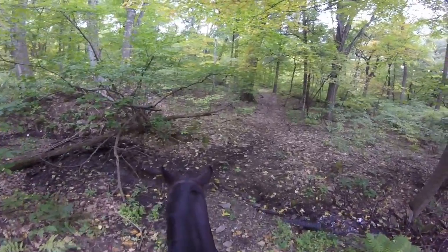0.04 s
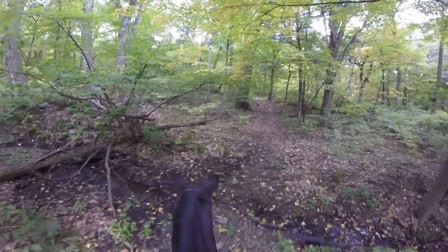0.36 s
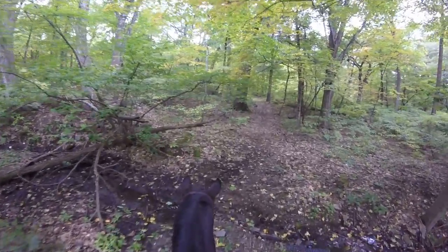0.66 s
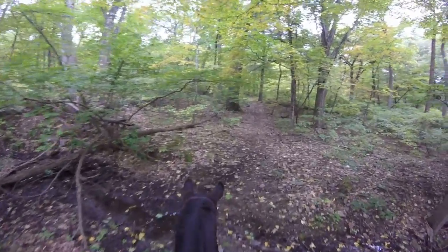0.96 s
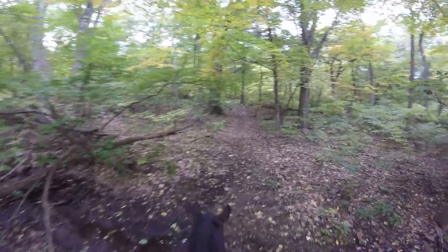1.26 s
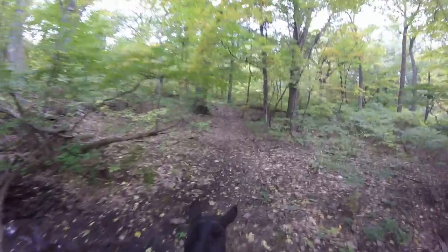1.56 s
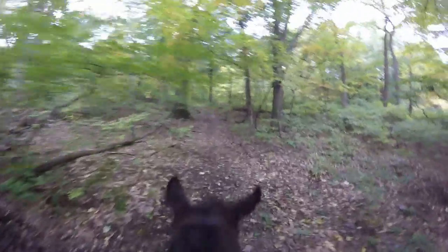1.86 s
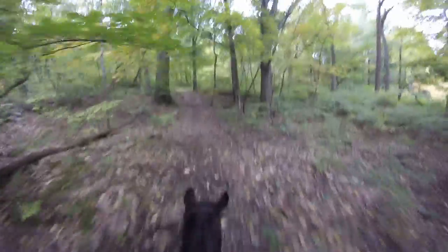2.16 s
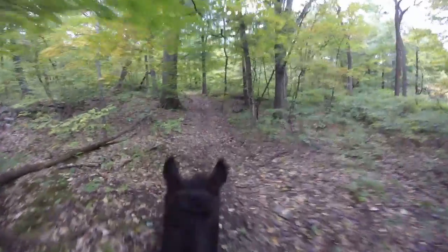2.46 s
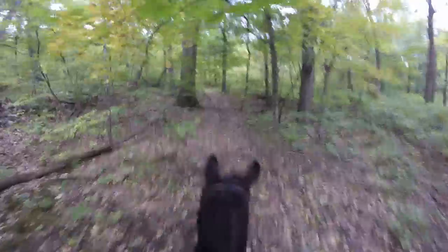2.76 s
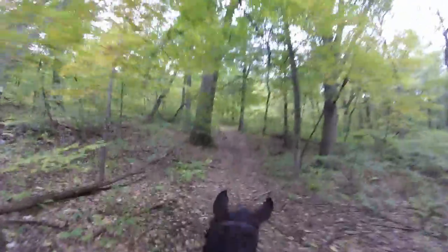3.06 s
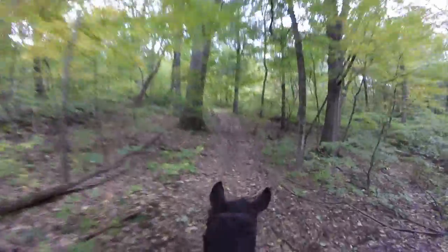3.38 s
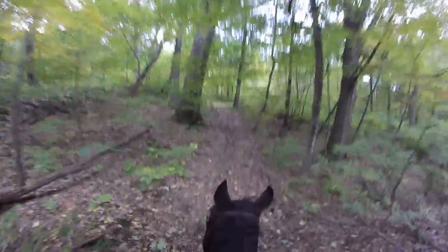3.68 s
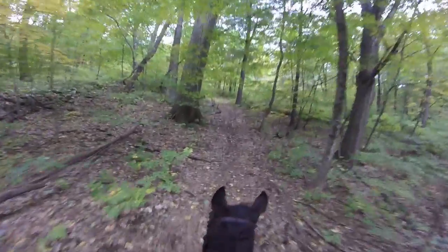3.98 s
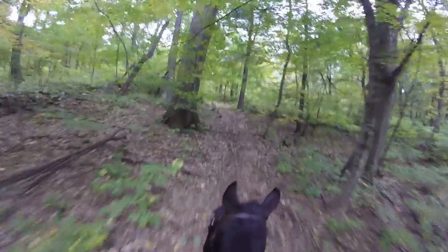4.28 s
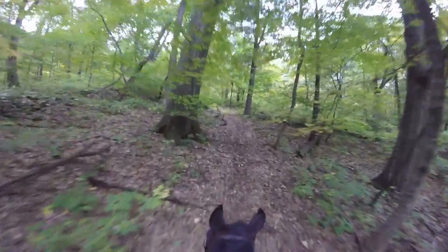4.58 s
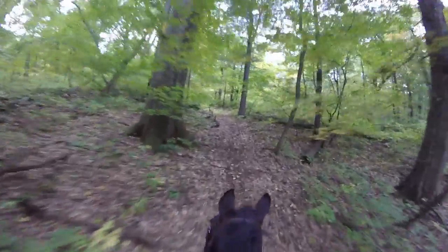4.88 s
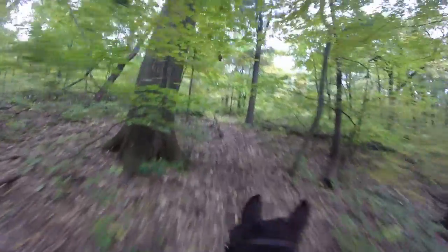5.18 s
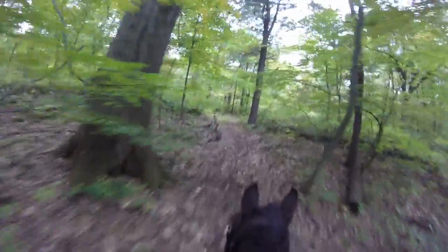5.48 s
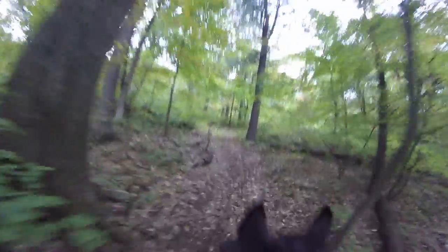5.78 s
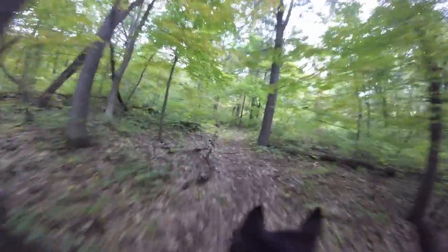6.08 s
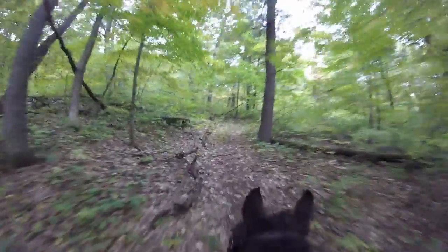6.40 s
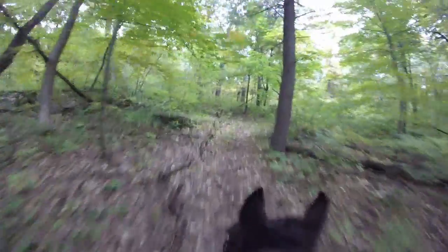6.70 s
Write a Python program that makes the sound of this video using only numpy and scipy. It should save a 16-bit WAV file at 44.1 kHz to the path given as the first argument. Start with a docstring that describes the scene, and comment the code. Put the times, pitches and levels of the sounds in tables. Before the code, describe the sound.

A ridden horse clacks over stone, strikes a rock, and speeds along a leafy trail with dull thuds and rustling.

```python
"""Horseshoes clack on a stony stream bed over a low rumble of the rider's movement and rushing air.
Each impact excites damped resonances of hoof and shoe; one sharp crack on a rock leaves the iron ringing.
The horse speeds up along a forest trail, where hooves thud in soft earth and brush through leaves
in showers of tiny snaps. A brief low hum comes at the end. The case of the rider's camera dulls it all."""
import sys
import numpy as np
from scipy import signal
from scipy.fft import rfft, irfft
from scipy.io import wavfile

SR = 44100
rng = np.random.default_rng(int(sys.argv[2]) if len(sys.argv) > 2 else 0)


def master_out(mix):
    """Clip the mix to full scale and print it as 16-bit PCM to the path in sys.argv[1]."""
    frames = np.transpose(np.atleast_2d(mix))
    ceiling = np.clip(frames, -1, 1)
    pcm = np.round(ceiling * 32767).astype(np.int16)
    wavfile.write(sys.argv[1], SR, pcm)


N = 306262
TIME = np.arange(N) / SR
AGE = np.arange(SR // 2) / SR   # seconds since a contact
SWAY_HZ = 48.25   # the lowest resonance, in which every jolt ends


def from_db(db):
    """Amplitude grows tenfold for every 20 dB."""
    return 10 ** (np.asarray(db) / 20)


def rms_one(x):
    """Normalisation to unit mean power."""
    return x / np.sqrt(np.mean(x ** 2) + 1e-20)


def add(track, start_s, sound):
    """Superposition: a sound sums into the track from its start time."""
    start = max(round(start_s * SR), 0)
    track[start:start + len(sound)] += sound[:max(N - start, 0)]


def resonate(force, hz, width_hz):
    """Two resonators in cascade give one peak with steep skirts."""
    r = np.exp(-np.pi * 1.5 * width_hz / SR)   # pole radius; each stage is wider than the pair
    gain = (1 - r * r) / 2
    section = [gain, 0, -gain, 1, -2 * r * np.cos(2 * np.pi * hz / SR), r * r]
    return signal.sosfilt([section, section], force + 1e-18)


def colour(force, peaks):
    """Parallel filters share the energy of a force among spectral peaks; rms 1."""
    return rms_one(sum(from_db(db) * rms_one(resonate(force, hz, width)) for hz, width, db in peaks))


def noise(spectrum):
    """Spectral shaping colours white noise, falling 12 dB more per octave beyond the ends; rms 1."""
    hz, db = np.transpose(spectrum)
    bin_hz = np.maximum(np.arange(N // 2 + 1) * SR / N, 1)
    rolloff = (np.minimum(bin_hz / hz[0], 1) * np.minimum(hz[-1] / bin_hz, 1)) ** 2
    shape = from_db(np.interp(np.log(bin_hz), np.log(hz), db))
    return rms_one(irfft(rfft(rng.standard_normal(N)) * rolloff * shape, N))


def grains(spread_db, size):
    """A log-normal spread of strengths turns noise into dense, uneven snaps."""
    return rng.standard_normal(size) * from_db(spread_db * np.clip(rng.standard_normal(size), -2, 2))


def after_footfalls(delay_s, half_length_s):
    """A Gaussian envelope swells to 1 just after each hoof lands on earth or stone."""
    peaks_s = np.array([row[0] for row in EARTH_STEPS + STONE_STEPS]) + delay_s
    distance_s = np.abs(TIME[:, None] - peaks_s).min(axis=1)
    return np.exp(-(distance_s / half_length_s) ** 2)


# The rider's rocking, greatest in the lunge out of the stream bed.
# Each row: time in seconds, rumble level in dB before footfalls and gusts.
RIDER_ROCKING = [(0.0, -63), (0.29, -57), (0.66, -60), (1.08, -57), (1.78, -50), (2.26, -38.5),
                 (2.7, -50.5), (3.19, -48), (3.38, -50.5), (3.88, -50), (4.0, -53), (4.72, -54),
                 (4.83, -54), (5.28, -55), (5.49, -47.5), (6.94, -54)]
# Spectra of the rumble and of the air. Each row: frequency in Hz, relative density in dB.
RUMBLE_SPECTRUM = [(12, 9.5), (22, 6), (35, -1.5), (50, 0), (80, -18.5), (140, -33), (300, -61)]
AIR_SPECTRUM = [(40, 2), (70, 2.5), (130, 4), (230, 1.5), (330, -4.5), (500, -9.5), (700, -16),
                (1200, -18.5)]


def movement(pace_db, shake_db=6, air_offset_db=1.03, gust_db=2.0):
    """Forced vibration: the camera sways with the rider, while gusts modulate the rumble and airflow."""
    rocking_db = np.interp(TIME, *np.transpose(RIDER_ROCKING))
    rumble_db = rocking_db + shake_db * after_footfalls(delay_s=0.041, half_length_s=0.06)
    gusts = from_db(gust_db * noise([(3, -2), (14, -2)]))   # fluctuations of 3 to 14 Hz
    rumble = from_db(rumble_db) * noise(RUMBLE_SPECTRUM)
    sway = from_db(-57.5) * rms_one(resonate(rng.standard_normal(N), SWAY_HZ, width_hz=10.7))
    air = from_db(pace_db + air_offset_db) * noise(AIR_SPECTRUM)
    return sway + gusts * (rumble + air)


# The background spectrum. Each row: frequency in Hz, relative density in dB.
HISS_SPECTRUM = [(200, -8), (400, -5), (750, -6.5), (1100, -8.5), (1550, -11), (2600, -13), (3600, -16),
                 (5000, -18.5), (7500, -22.5), (15000, -27.5)]


def hiss(level_db=-62):
    """Stationary broadband noise is heard as a faint, even hiss."""
    return from_db(level_db) * noise(HISS_SPECTRUM)


# Leaves as heard through the case. Each row: frequency in Hz, bandwidth in Hz, relative level in dB.
LEAF_COLOUR = [(1544, 220, 4.5), (2160, 360, 1), (2460, 410, -0.5), (2979, 530, -6), (3970, 140, -7)]


def rustle(pace_db, base_db=-70.5, middle_pace_db=-60, db_per_pace_db=0.68, stir_db=2.5):
    """Random excitation: tiny snaps drive the leaves, harder with pace and after each footfall."""
    level_db = base_db + db_per_pace_db * (pace_db - middle_pace_db)
    level_db += stir_db * after_footfalls(delay_s=0.043, half_length_s=0.075)
    return from_db(level_db) * colour(grains(spread_db=11.5, size=N), LEAF_COLOUR)


def scrape(length_s, peaks, top_hz, treble_peaks, treble_db, tail_db, tail_t60):
    """Friction makes noise as a shoe grinds on stone, then grit settles; unit power while it sounds."""
    pressure = np.sin(np.pi * np.minimum(AGE / length_s, 1)) ** .5
    settling = from_db(tail_db - 60 * AGE / tail_t60)
    force = (pressure + settling) * rng.standard_normal(len(AGE))
    # inertia keeps the shoe from following the fastest part of the force
    shoe = signal.sosfilt(signal.butter(8, top_hz, fs=SR, output="sos"), colour(force, peaks))
    sound = shoe + from_db(treble_db) * colour(force, treble_peaks)
    sounding_s = length_s + .002   # the sound lasts a little past the contact
    return sound * np.sqrt(sounding_s * SR / np.sum(sound ** 2))


def slap(top_hz, low_hz=190):
    """Yielding soil limits the bandwidth of an impulse; peak 1."""
    impulse = (AGE == 0) + 1e-18
    push = signal.sosfilt(signal.butter(2, low_hz, "high", fs=SR, output="sos"), impulse)
    push = signal.sosfilt(signal.cheby1(5, 2, top_hz, fs=SR, output="sos"), push)
    return push / np.abs(push).max()


def thud(start_hz, t60, glide_s=0.0056, rise_s=0.0032):
    """Damped oscillation: the pitch of a blow on soft ground settles to the lowest resonance."""
    hz = SWAY_HZ + (start_hz - SWAY_HZ) * np.exp(-AGE / glide_s)
    envelope = (1 - np.exp(-(AGE / rise_s) ** 2)) * from_db(-60 * AGE / t60)
    return -envelope / envelope.max() * np.sin(2 * np.pi * np.cumsum(hz) / SR)


# Shoes on stone. Each row: time in seconds, clack level before filtering in dB, contact in seconds,
# ring pitch in Hz, bandwidth in Hz, relative treble in dB, jolt in dB, slap in dB, slap cutoff in Hz.
STONE_STEPS = [(0.104, -44, 0.0031, 1460, 220, -11, -42.5, -60, 400),
               (0.3280, -39, 0.0042, 1600, 274, -14.5, -39.5, -44.5, 436),
               (0.614, -54.5, 0.0036, 2230, 500, -14, -53, -44.5, 345),
               (0.874, -37.5, 0.0088, 1590, 366, -15.5, -38, -47, 473),
               (0.8833, -38, 0.0024, 1960, 320, -16, -54, -56, 476),
               (1.1532, -33, 0.0098, 1564, 332, -18, -39.5, -50, 520),
               (1.762, -46, 0.0037, 1600, 400, -24, -66, -42, 900),
               (3.0851, -49, 0.0032, 1910, 1200, -18, -57, -60, 500),
               (4.471, -56.5, 0.0058, 1470, 500, -20, -62, -56.5, 500),
               (4.988, -55, 0.002, 1400, 500, -25, -65, -45, 820),
               (5.536, -40.5, 0.0042, 1780, 413, -38, -53, -43, 860),
               (5.7986, -36.5, 0.0026, 1900, 600, -29, -51, -39.5, 820),
               (6.556, -55, 0.0037, 1750, 500, -15, -58, -58, 520)]
# Modes of hoof and shoe. Each row: multiple of the ring pitch, relative level in dB.
HOOF_MODES = [(1, 6.5), (.88, -10), (1.28, -1.5), (1.48, -10.5), (1.84, -10)]
# Gritty treble of the clacks, coloured by the camera case's resonances.
# Each row: frequency in Hz, bandwidth in Hz, relative level in dB.
CLACK_TREBLE = [(4280, 466, 10), (4620, 230, -8), (6280, 220, 9), (6940, 350, 6), (7560, 350, 1)]
# Bands that the camera case dulls in the clacks. Each row: frequency in Hz, bandwidth in Hz.
CASE_NOTCHES = [(1080, 150), (3620, 1270), (5500, 850)]


def hooves_on_stone():
    """Impact rings the hoof and slaps the stone into the soil; a jolt follows as the leg is loaded."""
    clacks, ground = np.zeros((2, N))
    for s, db, length_s, pitch_hz, width_hz, treble_db, jolt_db, slap_db, slap_hz in STONE_STEPS:
        modes = [(ratio * pitch_hz, width_hz, mode_db) for ratio, mode_db in HOOF_MODES]
        clack = scrape(length_s, modes, top_hz=3170, treble_peaks=CLACK_TREBLE, treble_db=treble_db,
                       tail_db=-11, tail_t60=0.072)
        add(clacks, s - .001, from_db(db) * clack)
        add(ground, s + 0.0013, -from_db(slap_db) * slap(slap_hz))
        add(ground, s + 0.0071, from_db(jolt_db) * thud(SWAY_HZ, t60=0.19, rise_s=0.011))
    for hz, width_hz in CASE_NOTCHES:
        clacks = signal.lfilter(*signal.iirnotch(hz, hz / width_hz, fs=SR), clacks + 1e-18)
    # below its modes the hoof radiates little
    return ground + signal.sosfilt(signal.butter(6, 1230, "high", fs=SR, output="sos"), clacks)


# Hooves on earth. Each row: start in seconds, thud level in dB, starting pitch in Hz,
# time to decay by 60 dB in seconds.
EARTH_STEPS = [(1.496, -48, 240, 0.035), (1.906, -42, 32, 0.13), (2.065, -37, 30, 0.16),
               (2.234, -24.5, 36, 0.19), (2.311, -25.5, 44.6, 0.34), (2.573, -36.5, 169, .06),
               (2.620, -27.5, 289, 0.188), (2.831, -35, 170, 0.097), (2.967, -31, 71, 0.043),
               (3.04, -32, 84.5, 0.34), (3.189, -32.5, 166, 0.073), (3.641, -32, 150, 0.17),
               (3.688, -28.5, 175, 0.16), (3.828, -31.5, 150, 0.072), (4.334, -31, 233, 0.16),
               (4.734, -44, 79.5, 0.063), (4.987, -22, 264, 0.098), (5.338, -27.5, 184, 0.132),
               (5.503, -32.5, 48, 0.11), (5.54, -27, 54.7, 0.2), (5.794, -26.5, 250, 0.2),
               (6.067, -21.5, 228.5, 0.12), (6.219, -33, 155, 0.11), (6.554, -28, 185, 0.089),
               (6.613, -24.5, 151, 0.2), (6.818, -32.5, 150, 0.1)]


def hooves_on_earth(slap_db=-13.5, slap_at_hz=235, slap_db_per_octave=15.5):
    """Soft earth damps each blow to a thud; the higher its pitch, the harder the hoof slaps the soil."""
    out = np.zeros(N)
    soil = slap(top_hz=476)
    for s, db, start_hz, t60 in EARTH_STEPS:
        slap_gain = from_db(slap_db + slap_db_per_octave * np.log2(start_hz / slap_at_hz))
        add(out, s, from_db(db) * (thud(start_hz, t60) - slap_gain * soil))
    return out


# Hooves brushing leaves. Each row: start in seconds, level in dB, time scale in seconds,
# scratch pitch in Hz, relative level of the crisp treble in dB.
LEAF_SWEEPS = [(1.757, -51, 0.043, 1950, -16), (1.779, -54.5, 0.059, 2310, -14),
               (1.862, -57, 0.07, 1600, -16), (2.107, -47, 0.0096, 1500, -15),
               (2.116, -52.5, 0.069, 2600, -10.5), (2.373, -59.5, 0.049, 1600, -9),
               (2.401, -57, 0.032, 2940, -3.5), (2.483, -58, 0.054, 1500, -21.5),
               (2.513, -58, 0.025, 1500, -4.5), (2.826, -52, 0.038, 2840, -8.5),
               (3.108, -59.5, 0.055, 2400, -11), (3.388, -66, 0.073, 1600, -8),
               (3.848, -61.5, 0.032, 3200, -10), (5.830, -61, 0.15, 1640, -19),
               (6.012, -61, 0.0474, 2400, -5), (6.364, -59.5, .07, 3800, -9), (6.441, -60, 0.031, 1500, -4)]
# Crisp leaves heard through the case. Each row: frequency in Hz, bandwidth in Hz, relative level in dB.
LEAF_TREBLE = [(4500, 840, 5), (6180, 270, 8), (7650, 1800, 8.5), (9500, 2000, -19.5)]


def leaf_swishes(scratch_width_hz=510, scratch_db=1):
    """Impulsive excitation: leaves crackle under a hoof, and each sweep adds a resonance of its own."""
    out = np.zeros(N)
    for s, db, length_s, scratch_hz, crisp_db in LEAF_SWEEPS:
        snaps = grains(spread_db=8.5, size=len(AGE))
        envelope = (1 - np.exp(-6 * AGE / length_s)) * np.exp(-1.7 * AGE / length_s)
        peaks = [*LEAF_COLOUR, (scratch_hz, scratch_width_hz, scratch_db)]
        crackle = colour(snaps, peaks) + from_db(crisp_db) * colour(snaps, LEAF_TREBLE)
        add(out, s, from_db(db) * envelope / envelope.max() * crackle)
    return out


# A shoe skids, cracks against a rock and slips off.
# Each row: time in seconds, level in dB, contact in seconds, relative level of the chipping in dB.
ROCK_CONTACTS = [(2.1967, -35, .007, -10.5), (2.2037, -30, 0.0082, -23), (2.211, -19.5, 0.0016, -26.5),
                 (2.216, -30, 0.0029, -22), (2.2228, -43.5, 0.012, -11)]
# Spectral peaks of the sharp crack, made by rapid successive contacts, and the treble of stone chipping.
# Each row: frequency in Hz, bandwidth in Hz, relative level in dB.
CRACK_COLOUR = [(520, 83, -19.5), (1065, 81, -20), (1200, 91, -23), (1400, 150, -9.5), (1600, 120, -2),
                (1837, 140, -7), (2090, 150, -7.5), (2192, 240, 1), (2430, 140, -10.5), (2600, 35, -13),
                (2794, 98, -6.5), (3200, 130, -13.5), (3720, 100, -21.5), (3880, 72, -20.5)]
CHIP_TREBLE = [(3910, 230, 4), (5640, 650, -2), (6300, 450, -3), (7420, 610, -0.5), (9700, 1200, -10)]
# The iron shoe. Each row: frequency in Hz, relative level in dB, time to decay by 60 dB in seconds.
SHOE_MODES = [(1140, -17, 0.17), (1500, -19, .3), (1830, -2, 0.27), (1980, -18, .19), (2790, 0, 0.062),
              (3970, -23, .26)]


def crack(strike_s=2.211, ring_db=-37, knock_db=-31.5):
    """A hard strike knocks a rock into the soil and leaves the shoe ringing in free vibration."""
    out = np.zeros(N)
    for s, db, length_s, chip_db in ROCK_CONTACTS:
        strike = scrape(length_s, CRACK_COLOUR, top_hz=3960, treble_peaks=CHIP_TREBLE, treble_db=chip_db,
                        tail_db=-17, tail_t60=0.075)
        add(out, s - .002, from_db(db) * strike)
    add(out, strike_s - .006, -from_db(knock_db) * slap(top_hz=553))
    for hz, db, t60 in SHOE_MODES:
        envelope = from_db(ring_db + db - 60 * AGE / t60)
        add(out, strike_s, envelope * np.sin(2 * np.pi * hz * AGE))
    return out


def hum(peak_s=6.882, half_length_s=.025, hz=240, peak_db=-47):
    """A low pure tone swells and fades under a Gaussian envelope."""
    envelope = np.exp(-((TIME - peak_s) / half_length_s) ** 2)
    return from_db(peak_db) * envelope * np.sin(2 * np.pi * hz * TIME)


# The horse's pace. Each row: time in seconds, level in dB that drives the airflow and the rustle.
PACE_CURVE = [(0.0, -65.5), (1.66, -62.5), (2.34, -60), (3.58, -60), (3.75, -61), (4.12, -60.5),
              (5.82, -54.5), (6.94, -58)]


def scene():
    """The sources add linearly in one channel; air and rustle grow with the pace."""
    pace_db = np.interp(TIME, *np.transpose(PACE_CURVE))
    background = movement(pace_db) + hiss() + rustle(pace_db)
    horse = hooves_on_stone() + hooves_on_earth() + leaf_swishes() + crack()
    return (background + horse + hum())[None]


def record(dry, case_hz=10080, cutoff_hz=15000):
    """Low-pass filtering: the camera case rounds off the treble, and the very top is cut steeply."""
    dull = signal.sosfilt(signal.butter(2, case_hz, fs=SR, output="sos"), dry)
    return signal.sosfilt(signal.ellip(12, .1, 80, cutoff_hz, fs=SR, output="sos"), dull)


dry = scene()
out = record(dry)
master_out(out)
```